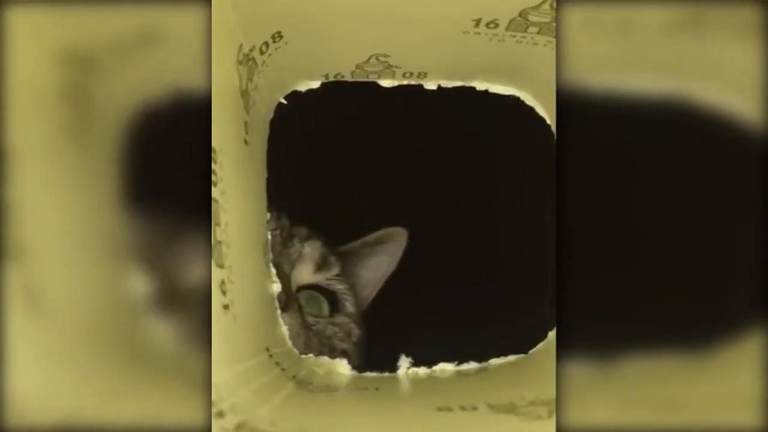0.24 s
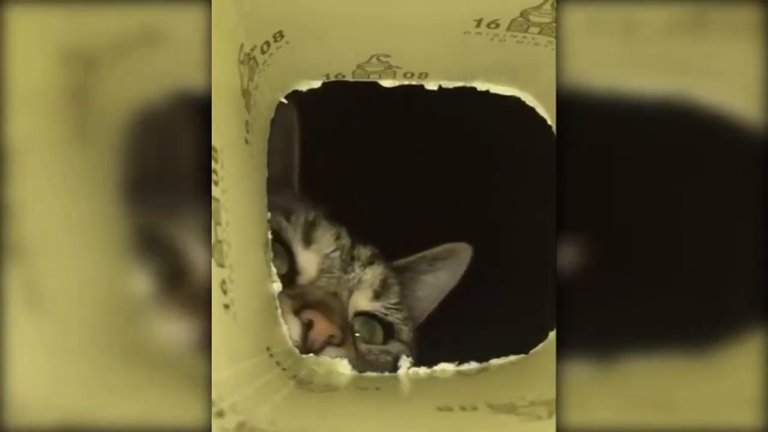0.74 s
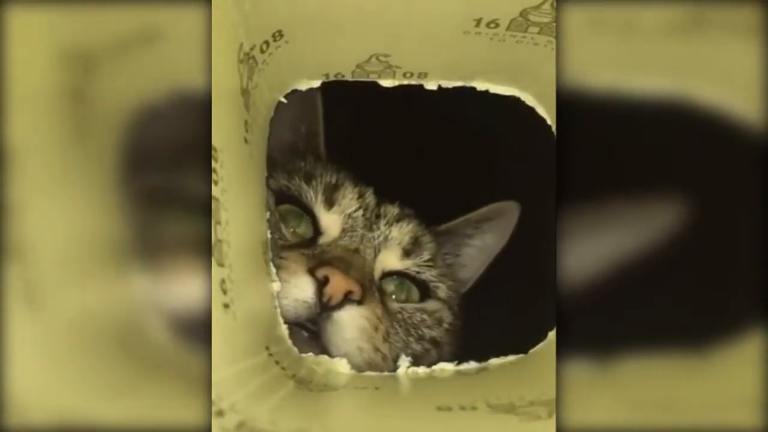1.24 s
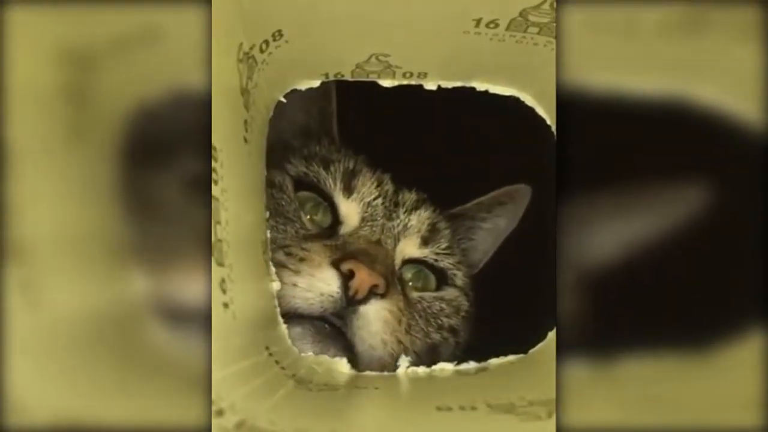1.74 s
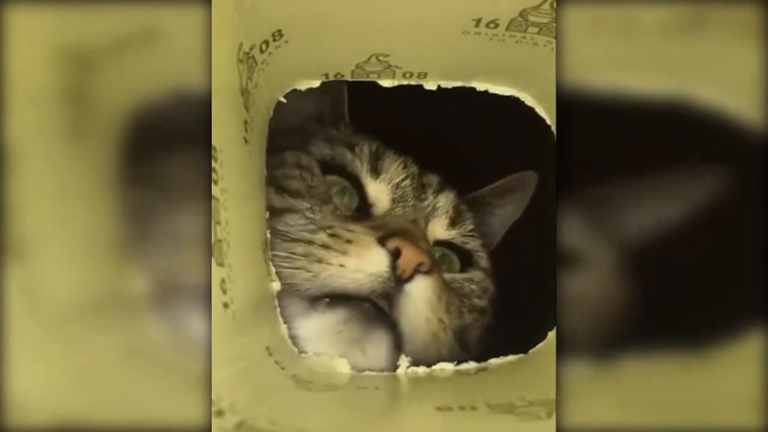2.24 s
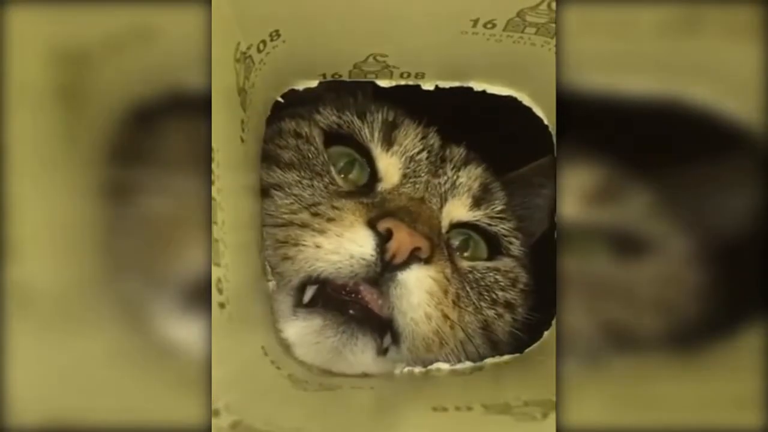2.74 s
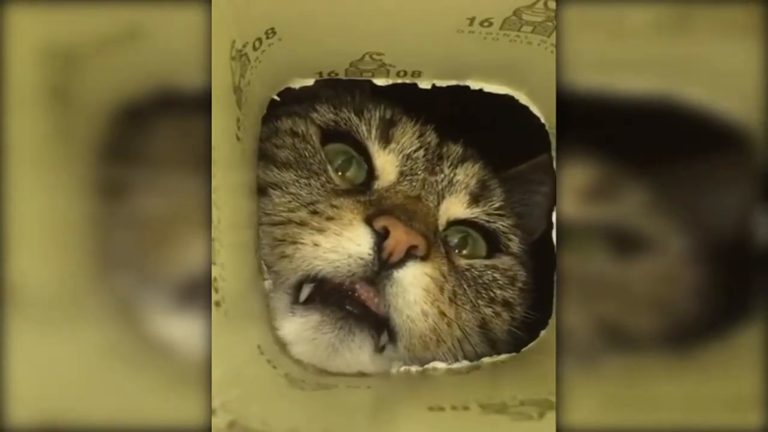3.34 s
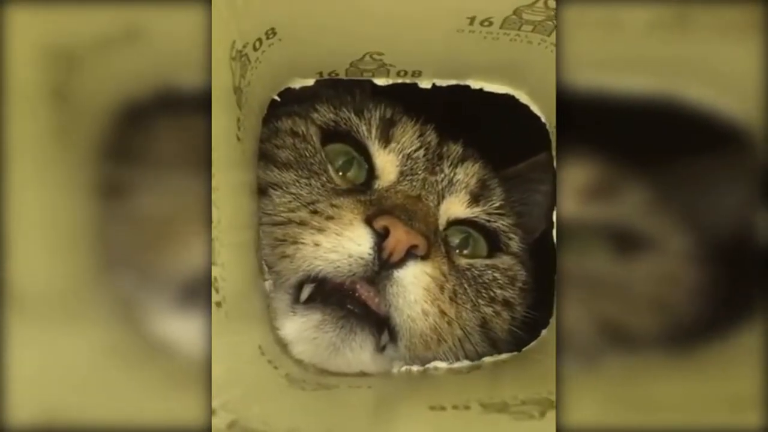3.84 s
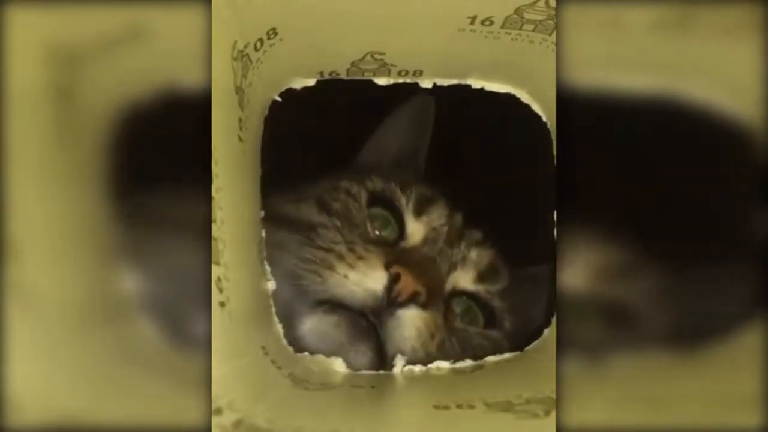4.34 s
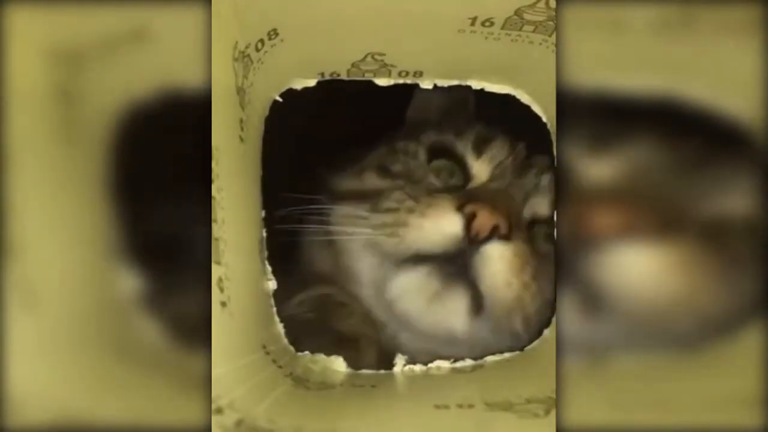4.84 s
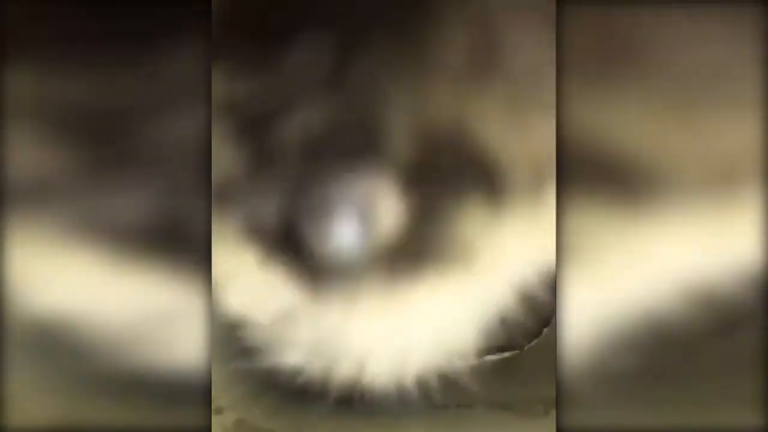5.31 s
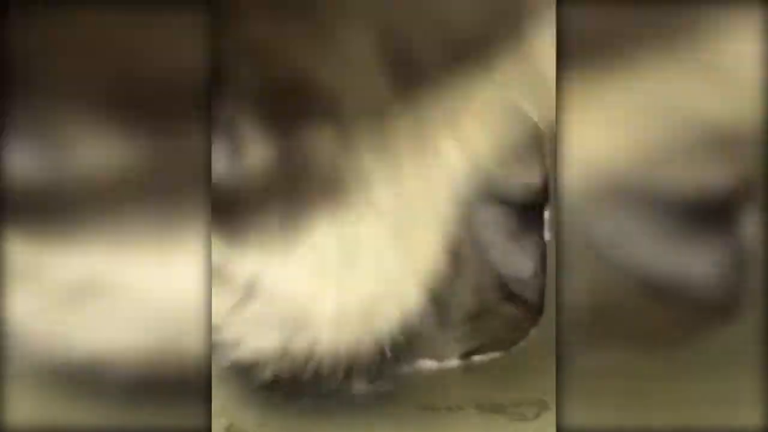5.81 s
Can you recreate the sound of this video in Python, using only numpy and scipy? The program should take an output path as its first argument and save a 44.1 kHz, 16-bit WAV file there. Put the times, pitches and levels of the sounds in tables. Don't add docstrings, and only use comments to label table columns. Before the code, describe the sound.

Two cats scuffle at a cardboard box. It opens with a dull hollow knock and a buzzing cardboard groan, then mostly quiet brushing, faint squeaks and occasional low thumps from inside. A tight group of strong thuds comes midway, then softer bumps. Near the end the sound turns close and bright: sharp claw ticks, rough scraping, fur hiss and crowded heavy knocks, very near the microphone, over low room hum.

```python
import sys
import numpy as np
from scipy import signal
from scipy.fft import rfft, irfft, next_fast_len
from scipy.io import wavfile
from scipy.ndimage import uniform_filter1d, map_coordinates

SR = 44100
rng = np.random.default_rng(int(sys.argv[2]) if len(sys.argv) > 2 else 0)


def persist_wave(psi):
    counts = np.round(np.clip(psi, -1, 1) * 32767).astype(np.int16)
    wavfile.write(sys.argv[1], SR, np.atleast_2d(counts).T)


def gain_from_decibels(decibels):
    exponent = np.asarray(decibels, float) / 20
    return 10 ** exponent


N = 267687

# (time [s], peak [dB], wall pitch [Hz], claw relative to wall [dB])
INNER_PAWS = [(0, -10, 210, -32), (.0065, -6, 150, -18), (.014, -5, 267, -15.5), (.07, -16, 225, -42),
              (0.116, -21.5, 205, -32), (0.129, -28.5, 313, -41.5), (0.247, -38, 300, -12),
              (0.394, -34, 296, -15), (0.619, -37, 236, -13), (1.191, -12.5, 264, -17),
              (2.325, -23, 229, -24.5), (2.347, -3, 217.5, -23.5), (2.363, -28, 195, -13),
              (2.696, 3, 290, -12), (2.765, 1, 286, -14.5), (2.801, -7, 280, -14), (3.424, -22.5, 275, -23),
              (3.462, -24.5, 248, -22), (3.86, -36.5, 207, -16.5), (3.925, -29, 132.6, -31),
              (3.945, -22, 154, -38), (3.951, -19, 200, -18), (3.993, -18.5, 173, -21),
              (4.001, -14.5, 204, -30), (4.034, -16.5, 170, -47), (4.07, -29, 176, -20),
              (4.388, -22.5, 151, -28), (4.748, -37, 171, -17)]
# (time [s], peak [dB], wall pitch [Hz], claw relative to wall [dB])
OUTER_PAWS = [(5.244, -39.5, 199, 12.5), (5.31, -22, 445, -20), (5.3993, -1.5, 282, -42),
              (5.402, -10, 513, -34), (5.405, -6, 115, 3), (5.407, 3.5, 269, -29.5),
              (5.4085, -20, 735, -27), (5.415, -17, 202, -29), (5.427, -19, 139, -29),
              (5.451, -26.5, 650, 6), (5.463, -25, 640, 7), (5.607, -4.5, 352, -9.5),
              (5.618, -16.5, 650, 1.5), (5.626, -5.5, 250, -34), (5.613, -17, 420, -25),
              (5.622, -21.5, 550, -24), (5.635, -18, 400, -22), (5.646, -27, 210, -15),
              (5.683, -28.5, 250, -19.5), (5.78, -25, 210, -20), (5.667, -21.5, 580, -35),
              (5.711, -9.5, 164, -15.5), (5.7401, -6, 273, -34), (5.746, -3.5, 197, -10.5),
              (5.7493, -6, 430, -24), (5.7514, -1, 280, -21), (5.7573, -14, 232, -40),
              (5.786, -11, 263, -13.5), (5.842, -24, 125, -23), (6.013, -27.5, 315, -14)]
# (time [s], peak [dB])
TICKS = [(.115, -43), (.957, -51), (1.076, -52), (1.3783, -34.5), (3.945, -27.5), (3.996, -35),
         (4.029, -37.5), (4.8665, -49), (5.2457, -4.5), (5.283, -31), (5.103, -28), (5.114, -26),
         (5.126, -22.5), (5.469, -26), (5.564, -27), (5.621, -30), (5.915, -31), (5.312, -13.5),
         (5.365, -35.5), (5.4049, -13.5), (5.451, -33), (5.6081, -7), (5.669, -34), (5.7112, -31),
         (5.7455, -17.5), (5.753, -25), (5.767, -16), (5.7868, -5.5),
         (0.7262, -62), (0.7601, -56), (0.798, -55), (0.8165, -43), (0.9985, -54), (1.0255, -56),
           (1.0549, -52), (1.0749, -48), (1.1931, -43), (1.1944, -30.5), (1.343, -46), (1.3779, -40),
           (1.5246, -45), (1.6937, -44), (1.813, -55), (1.994, -51), (2.0045, -50), (2.0325, -42),
           (2.0838, -41), (2.1228, -37), (2.247, -45), (2.2819, -43), (2.2999, -33)]
# (centre [Hz], width [Hz], level [dB])
CLAW_MODES = [(670, 140, -11), (1300, 180, 2), (2310, 142, 3), (2640, 110, -5), (3160, 400, -13),
              (4020, 290, -16), (5180, 60, -20.5)]
# (time [s], slip rate [Hz], level [dB], overtones [dB])
JUDDER = [
    (0, 430.5, -11.5, -20.5),
    (.011, 397, -16.5, -4),
    (.019, 415, -13.5, -17),
    (.045, 418.5, -14.5, -13),
    (.072, 419, -14, -16.5),
    (.09, 418, -31, -16),
]
# (peak [s], rise [s], fall [s], wall rumble [dB], panel drone [dB])
LEANS = [(.04, 0.042, 0.13, -27, -40.5), (.125, 0.049, 0.28, -45.5, -56.5), (.93, 0.091, 0.09, -40.5, -46),
         (1.22, 0.092, 0.17, -47, -54.5), (1.4, 0.18, 0.21, -54, -61.5), (1.64, 0.11, 0.18, -49, -57),
         (2.08, 0.063, 0.38, -51.5, -60), (2.35, 0.11, 0.083, -34.5, -43), (2.44, 0.13, 0.31, -45, -53),
         (2.74, 0.072, 0.042, -39, -52), (2.82, 0.071, 0.095, -38, -52), (3.09, 0.049, 0.027, -50, -58.5),
         (3.25, 0.076, 0.12, -44.5, -70), (3.46, 0.044, 0.35, -47, -64.5), (3.73, 0.12, 0.14, -43, -80),
         (3.96, 0.071, 0.049, -31, -51), (4.03, 0.079, 0.21, -37.5, -54.5),
         (4.388, 0.015, 0.13, -41, -50), (4.6, 0.11, 0.024, -39.5, -49), (4.75, 0.14, 0.19, -50, -58.5),
          (4.918, 0.1, 0.067, -49.5, -46), (5.13, 0.12, 0.15, -36, -37.5),
          (5.231, 0.094, 0.062, -33.5, -39.5), (5.312, 0.027, 0.12, -37, -42.5),
          (5.404, 0.021, 0.16, -30, -39), (5.53, 0.16, 0.13, -57, -44.5), (5.65, 0.12, 0.13, -34.5, -44),
          (5.752, 0.019, 0.019, -15.5, -16), (5.79, .05, 0.037, -24.5, -43.5),
          (5.88, 0.25, 0.5, -44.5, -43), (6.034, 0.066, 0.04, -26, -42.5)]
# (peak [s], rise [s], fall [s], pad scrape [dB], fur hiss [dB])
STROKES = [(.58, 0.048, .05, -68, -82), (1.08, 0.065, .12, -66, -70), (0, .01, 0.14, -47, -52),
           (.128, 0.017, 0.029, -53.5, -55), (.85, 0.12, 0.11, -55.5, -55.5), (.93, 0.16, 0.073, -55, -79),
           (1.07, 0.1, 0.25, -75, -57), (1.21, 0.075, 0.048, -51.5, -59.5), (1.36, 0.076, 0.18, -54, -57),
           (1.57, 0.46, 0.066, -52.5, -59), (1.76, 0.19, 0.54, -65, -69.5), (2.06, 0.061, 0.48, -53, -55.5),
           (2.16, 0.2, 0.069, -44, -57.5), (2.35, 0.11, 0.12, -44.5, -43), (2.4, 0.037, 0.23, -45, -49.5),
           (2.7, 0.015, 0.0071, -78, -47.5), (2.81, 0.46, 0.17, -61.5, -66.5),
           (3.25, 0.091, 0.054, -66.5, -73), (3.43, 0.0073, 0.033, -59, -60.5),
           (3.73, 0.088, 0.073, -68.5, -76.5), (3.914, 0.0037, 0.021, -48, -61),
           (3.95, 0.021, 0.11, -52.5, -49.5), (4.08, 0.15, 0.11, -59, -50), (4.19, 0.31, 0.094, -50, -58),
           (4.29, .08, .05, -71, -63), (4.35, .02, .02, -76, -68), (4.72, .016, 0.036, -65, -56),
          (4.805, 0.066, 0.017, -59.5, -55.5), (5.1, .007, .04, -46, -43.5), (5.232, .03, .015, -43, -45),
          (4.395, 0.005, 0.019, -52, -66), (4.56, 0.099, .05, -55.5, -45),
          (4.586, 0.026, 0.031, -51.5, -37.5), (4.68, 0.04, 0.011, -71.5, -66),
          (4.741, 0.037, 0.086, -50.5, -51), (4.92, 0.042, 0.035, -50, -58),
          (5.031, 0.082, 0.24, -52.5, -47.5), (5.121, 0.037, 0.061, -29.5, -35),
          (5.17, 0.079, 0.11, -34, -37.5), (5.299, 0.016, 0.073, -41, -45), (5.4, 0.037, 0.13, -43.5, -42),
          (5.472, .014, 0.018, -37.5, -50), (5.52, 0.18, 0.089, -44, -52.5),
          (5.611, 0.076, 0.033, -37, -32.5), (5.668, 0.028, 0.063, -47.5, -47.5),
          (5.76, 0.02, .05, -58, -55), (5.803, 0.078, 0.1, -39, -36.5), (5.925, 0.055, 0.063, -58, -36.5),
          (5.99, 0.15, 0.032, -58, -33), (6.019, 0.089, 0.06, -42, -50)]
# rumble [dB], drone [dB], scrape [dB], hiss [dB]
REST_DB = [-59, -67.5, -76.5, -78.5]
# (frequency [Hz], density [dB per Hz])
RUMBLE = [(18, -51.5), (42, -1.5), (113, -8.5), (151, -3.5), (199, -5), (230, -4.5), (278, -1), (430, -12),
          (560, -20), (950, -120)]
# (centre [Hz], width [Hz], level [dB])
PANEL_MODES = [(541, 28, -9.5), (656.6, 45.6, 1.5), (783, 144, -7.5), (895, 226, -10)]
# (centre [Hz], width [Hz], level [dB])
BOX_MODES = [(1300, 125, 1.5), (1308, 147, 7.5), (2230, 110, -6), (2372, 43, 2), (2631, 51, 1),
             (3140, 145, -7), (3570, 100, -9.5), (3780, 117, -9), (5200, 23, -14)]
# (frequency [Hz], density [dB per Hz])
BARE = [(530, -15), (900, 0.5), (1410, 3.5), (1660, -1.5), (2240, -0.5), (2940, -8), (5000, -19),
        (6500, -61), (11000, -120)]
# (frequency [Hz], density [dB per Hz])
HISS = [(2290, -2), (3900, -2), (4110, -3), (4460, -5.5), (5340, -11.5), (6710, -2), (7440, -2.5),
        (8040, -7), (9050, -3), (10200, -9.5), (11100, -6.5), (12600, -8.5), (13400, -14.5)]
# (time [s], centre [Hz])
CAVITY = [(.8, 3000), (1.6, 3160), (2.1, 1486), (2.4, 3000), (4.58, 2760), (5.1, 3200), (5.2, 3000),
          (5.26, 3000), (5.295, 4360), (5.32, 3770), (5.45, 3000), (5.55, 3200), (5.75, 1770), (5.8, 4320),
          (5.98, 4670), (6.03, 4000)]
# (frequency [Hz], density [dB per Hz])
ROOM = [(15, -58), (25, 4), (82, 7.5), (142, -34.5), (288, -24.5), (463, -55), (635, -14), (804, -27),
        (1290, -10.5), (1680, -24.5), (2360, -50), (4930, -52), (6590, -39.5), (11700, -40), (13400, -27.5)]
# centre [Hz], width [Hz], level [dB]
HUM = (88.8, 11.4, -54)
# (centre time [s], half length [s], centre [Hz], width [Hz], level [dB])
SINGS = [(.132, 0.0053, 3300, 400, -54.5), (0.258, 0.064, 2380, 121, -69.5), (0.839, 0.046, 3630, 602, -56),
         (0.864, .06, 2580, 159.6, -55), (.86, 0.041, 5100, 203, -71), (0.94, 0.029, 652, 69.3, -44),
         (1.118, 0.082, 3430, 900, -67), (1.103, 0.088, 5160, 199, -75), (1.497, .1, 5080, 201, -72),
         (1.552, 0.028, 2580, 198, -55), (4.395, .005, 3520, 497, -57), (5.747, 0.0026, 1450, 299.4, -23.5),
         (5.788, .003, 1620, 303, -36), (0.62, 0.0071, 600, 251.7, -51), (3.469, 0.0044, 697, 298, -46.5),
         (1.194, 0.0032, 680, 201.2, -34.5), (0.909, .05, 1151, 600, -53), (1.26, .06, 900, 700, -56),
         (4.447, 0.004, 2300, 250, -57), (4.477, 0.0094, 6700, 202, -69), (4.584, 0.0063, 3270, 301, -42),
         (4.593, .01, 2460, 298, -43), (4.76, 0.023, 2485, 198, -55.5), (4.778, 0.031, 5120, 300, -63),
         (5.132, 0.022, 1205, 301.7, -33), (5.15, 0.038, 3380, 903, -38.5), (5.16, 0.065, 2310, 400, -40.5),
         (5.297, 0.009, 3290, 1002, -38), (5.299, 0.0079, 4250, 1106, -37),
         (5.312, 0.0046, 4480, 1100, -37), (5.292, 0.009, 4910, 1090, -48), (5.17, .05, 1696, 1100, -43),
         (5.409, .004, 744, 303, -17), (5.428, 0.0042, 2240, 250, -38), (5.464, 0.03, 3130, 300, -51),
         (5.511, 0.031, 3400, 302, -47), (5.548, 0.035, 4350, 399, -52.5), (5.568, 0.021, 3180, 304, -43),
         (5.586, 0.033, 2000, 499, -40), (5.811, 0.039, 3350, 349.4, -42), (5.837, .02, 1390, 152, -45),
         (5.956, 0.092, 2880, 299.6, -45), (5.97, 0.031, 4470, 401, -51), (6.018, 0.0018, 1200, 299, -27)]
# (centre time [s], half length [s], pitch [Hz], slide [1/s], level [dB])
PINGS = [
    (.39, .075, 608, 0, -57),
    (1.9, .045, 396, -1.2, -51),
    (4.398, .009, 2380, 0, -51),
]
# (time [s], peak [dB], pitch [Hz], t60 [ms])
THUMPS = [(1.193, -24, 130, 48), (2.349, -24.5, 117, 58), (2.698, -19.5, 60.5, 34), (2.699, -18.5, 149, 21),
          (2.768, -21, 150, 29), (2.804, -31, 150, 24), (3.426, -26, 144, 42), (3.95, -19, 111, 38),
          (4.004, -21, 112, 46), (4.074, -30, 79.4, 73), (4.389, -24.5, 116, 40), (4.75, -33.5, 56.5, 63),
          (5.245, -35, 111, 96), (5.299, -36, 63.6, 190), (5.63, -14, 97, 33), (6.029, -17, 81.4, 34)]
# time [s], peak [dB], pitch [Hz], t60 [ms]
JOLT = (5.7612, 2.1, 99, 27)

OUTSIDE_S = 5.05
RING_MS, RING_MS_PER_DB = 31.9, 1.19
HELD_MS = 18.5
SAG, DEEP_SAG, SAG_S = 0.15, 0.93, 0.0034
ANSWER_S, ANSWER_DB, ANSWER_T60_S, SWELL_S = 0.01278, -14.5, 0.029, 0.011
TOP_DB = -25
EDGE_DB, LEAN_POWER, STROKE_POWER = 22.5, 1.53, 1.67
LIFT_DB, FLAT_HZ, OUTER_DB = 5.5, 1950, 4
ROOM_DB = -63
BOW = 13
LOW_HZ, TOP_HZ, FULL = 40, 13250, .98
WIDE_HZ = 4300


def unit(x):
    return x / np.sqrt(np.mean(x ** 2) + 1e-20)


def colour(points):
    f, v = np.transpose(points)
    return lambda hz: gain_from_decibels(np.interp(np.log(hz + 1), np.log(f + 1), v))


def resonant(peaks):
    def response(f):
        total = 0
        for k, (centre, width, db) in enumerate(peaks):
            damping = 1j * f * width
            total = total + (-1) ** k * gain_from_decibels(db) * damping / (centre * centre - f * f + damping + 1e-9)
        return total
    return response


def curves(rows):
    s, *cols = np.transpose(rows)
    return [np.interp(np.arange(N) / SR, s, c) for c in cols]


def wobble(rate):
    return map_coordinates(rng.standard_normal(int(N * rate / SR) + 4), [np.arange(N) * rate / SR])


def filtered(x, response):
    m = next_fast_len(N + SR // 2)
    return irfft(rfft(x, m) * response(np.fft.rfftfreq(m, 1 / SR)), m)[..., :N]


def wall_ring(t, hz, db, outside):
    if outside:
        fall_db = -60000 * t / max((RING_MS - RING_MS_PER_DB * db) * 0.68, 8)
        sag, rest, gain_db, onset_s = SAG, .947, 3.0, .0014
    else:
        fall_db = -60 * (1000 * t / (HELD_MS - .12 * db)) ** 1.77
        sag, rest, gain_db, onset_s = DEEP_SAG, .77, -.8, .0019
    bent = t + sag * SAG_S * (1 - np.exp(-t / SAG_S))
    ring = -np.sin(2 * np.pi * rest * hz * bent)
    ring += 0.13 * np.sin(2 * np.pi * 1.42 * hz * t)
    ring += .5 * gain_from_decibels(1.27 * fall_db) * np.sin(2 * np.pi * 1.64 * hz * t)
    ring += 0.064 * np.sin(2 * np.pi * 620 * t)
    return gain_from_decibels(db + gain_db + fall_db) * (1 - np.exp(-(t / onset_s) ** 2)) * ring


def air_answer(t, hz, db):
    late = t - ANSWER_S
    envelope = gain_from_decibels(db + ANSWER_DB - 60 * late / ANSWER_T60_S) * (1 - np.exp(-(t / SWELL_S) ** 6))
    return envelope * np.cos(2 * np.pi * 1.09 * hz * late)


def claw_contact(t, grit, outside):
    if outside:
        return 0.96 * t / 0.0017 * np.exp(-t / 0.0016) * grit
    point = 0.67 * np.exp(-((t - .0004) / .00005) ** 2)
    pad = 0.088 * np.exp(-((t - .002) / 0.00028) ** 2)
    return point + pad + 0.17 * gain_from_decibels(-60 * t / 0.017) * grit


def knocks():
    wall, claw, pad, bare, top = np.zeros((5, N + SR))
    t = np.arange(SR // 10) / SR
    lag = round(.001 * SR)
    paws = INNER_PAWS + OUTER_PAWS
    for (s, db, hz, claw_db), grit in zip(paws, rng.standard_normal((len(paws), 2, len(t)))):
        at = round((s + 0.00091) * SR)
        outside = s > OUTSIDE_S
        wall[at + lag:][:len(t)] += wall_ring(t, hz, db, outside)
        if not outside:
            wall[at + lag:][:len(t)] += air_answer(t, hz, db)
        struck = pad if outside else claw
        struck[at:][:len(t)] += gain_from_decibels(db + claw_db + 18.5) * claw_contact(t, grit[0], outside)
        top[at:][:len(t)] += gain_from_decibels(db + claw_db + TOP_DB - 60 * t / 0.036) * grit[1]
    catches = TICKS
    for (s, db), grit in zip(catches, rng.standard_normal((len(catches), len(t)))):
        bare[round(s * SR):][:len(t)] += gain_from_decibels(db + 14.5 - 60 * t / 0.0093) * (0.73 * grit + 5.7 * (t == 0))
    face = resonant([(660, 240, -5.5), (1456, 260, 4.0), (3000, 1150, -1.0)])
    padded = resonant([(600, 250, 3), (1400, 600, 0)])
    snap = gain_from_decibels(-11.5) * filtered(bare[:N], lambda f: face(f) / (1 + 1j * f / 4440.0) ** 2)
    snap += gain_from_decibels(-6.5) * filtered(pad[:N], lambda f: padded(f) / (1 + 1j * f / 2800.0) ** 2)
    return wall[:N] + filtered(claw[:N], resonant(CLAW_MODES)) + snap + filtered(top[:N], colour(HISS))


def judder():
    hz, db, over_db = curves(JUDDER)
    t = np.arange(N) / SR
    jitter = .04 * np.exp(-t / .008) * wobble(300) + .007 * wobble(300)
    turn = 2 * np.pi * np.cumsum(hz * (1 + jitter)) / SR
    over = np.sin(2 * turn + 1) + 0.5 * np.sin(3 * turn + 2)
    for harmonic, gain in enumerate([0.21, 0.18, 0.22, 0.048, 0.07, 0.034], start=4):
        over += gain * np.sin(harmonic * turn)
    over += 0.23 * gain_from_decibels(3 * wobble(60)) * sum(np.sin(odd * turn / 2) * 3 / odd for odd in range(3, 15, 2))
    body_modes = resonant([(126, 57, -4.5), (253, 57, 5.5), (576, 175, -4.5)])
    body = gain_from_decibels(-19.5 - 160 * t) * unit(filtered(rng.standard_normal(N), body_modes))
    modes = resonant(PANEL_MODES + BOX_MODES)
    slips = rng.standard_normal(N) * (1 + np.cos(turn))
    buzz = filtered(slips, lambda f: modes(f) / (1 + 1j * f / 2800) ** 2)
    rattle = gain_from_decibels(-26.5 - 170 * t) * unit(buzz)
    groan = gain_from_decibels(db + 1.5) * (np.sin(turn) + gain_from_decibels(over_db) * over)
    return (groan + rattle) * np.clip((.089 - t) / 0.034, 0, 1) + body * np.clip((.115 - t) / 0.032, 0, 1)


def contacts(rows, top):
    s, rise, fall, *db = np.array(rows).T[..., None]
    t = np.arange(0, N + 64, 64) / SR
    reach = np.where(t < s, (s - t) / np.maximum(rise, .003), (t - s) / np.maximum(fall, .003))
    powers = [np.sum(gain_from_decibels(d - EDGE_DB * reach ** top) ** 2, axis=0) for d in db]
    return [np.interp(np.arange(N) / SR, t, power) for power in powers]


def fibres(spread_db, clump_db):
    return rng.standard_normal(N) * gain_from_decibels(spread_db * rng.standard_normal(N) + clump_db * wobble(120))


def patchy(x, patchy_db, share):
    hz, t, z = signal.stft(x, SR, nperseg=512)
    field = uniform_filter1d(uniform_filter1d(rng.standard_normal(z.shape), 5, 0), 10, 1)
    centre_hz = np.interp(t, *np.transpose(CAVITY))
    bump = np.exp(-(np.log((hz[:, None] + 1) / centre_hz) / .13) ** 2)
    lift_db = LIFT_DB * np.log2(centre_hz / FLAT_HZ) + OUTER_DB * (t > OUTSIDE_S)
    gain = gain_from_decibels(patchy_db * unit(field) + share * lift_db * bump)
    return signal.istft(z * gain, SR, nperseg=512)[1][:N]


def rubbing():
    leaning = contacts(LEANS, LEAN_POWER)
    stroking = contacts(STROKES, STROKE_POWER)
    gains = np.sqrt(leaning + stroking + gain_from_decibels(REST_DB)[:, None] ** 2)
    catch = wobble(25)
    push = filtered(rng.standard_normal(N), colour(RUMBLE))
    rumble = unit(gain_from_decibels(2.6 * wobble(40) + 1.3 * catch) * push)
    panels = filtered(rng.standard_normal(N), resonant(PANEL_MODES))
    drone = unit(gain_from_decibels(1.5 * catch + 3 * wobble(50)) * panels)
    grain = fibres(spread_db=2.5, clump_db=2.5)
    modes = resonant(BOX_MODES)
    inner = unit(filtered(grain, lambda f: modes(f) * f ** 4 / (f ** 4 + 310.0 ** 4)))
    outer = unit(filtered(grain, colour(BARE)))
    board = np.where(np.arange(N) < OUTSIDE_S * SR, inner, outer)
    scrape = unit(gain_from_decibels(.5 * catch) * patchy(board, 1.0, share=0.65))
    fur = filtered(fibres(spread_db=4, clump_db=2.0), colour(HISS))
    hiss = unit(gain_from_decibels(0.21 * catch) * patchy(fur, 3.8, share=0.76))
    return np.sum(gains * [rumble, drone, scrape, hiss], axis=0)


def room():
    hz, width_hz, db = HUM
    air = gain_from_decibels(ROOM_DB + 0.72 * wobble(1.8)) * unit(filtered(rng.standard_normal(N), colour(ROOM)))
    hum = gain_from_decibels(db) * unit(filtered(rng.standard_normal(N), resonant([(hz, width_hz, 0)])))
    return air + hum


def sings():
    half_span = SR // 5
    out = np.zeros(N + SR)
    t = np.arange(-half_span, half_span) / SR
    for (s, half, hz, width_hz, db), knots in zip(SINGS, rng.standard_normal((len(SINGS), 2, 500))):
        a, b = (map_coordinates(k, [(t - t[0]) * min(width_hz, 1200)]) for k in knots)
        swell = np.exp(-(t / half) ** 2)
        band = swell * (a * np.sin(2 * np.pi * hz * t) + b * np.cos(2 * np.pi * hz * t))
        level = gain_from_decibels(db) * np.linalg.norm(swell) / np.linalg.norm(band)
        out[round(s * SR) + half_span:][:len(t)] += level * band
    return out[2 * half_span:][:N]


def pings():
    out = np.zeros(N)
    for s, half, hz, slide, db in PINGS:
        t = np.arange(N) / SR - s
        swell = gain_from_decibels(db + wobble(55)) * np.exp(-(t / half) ** 4)
        arch = t * (1 + slide * t / 2 - BOW * t ** 2 / 3)
        out += swell * np.sin(2 * np.pi * hz * arch + 0.42 * wobble(22.4))
    return out


def thumps():
    out, t = np.zeros(N + SR), np.arange(SR // 5) / SR
    for s, db, hz, t60_ms in [*THUMPS, JOLT]:
        envelope = gain_from_decibels(db + 7.5 - 60000 * t / max(t60_ms, 15)) * (1 - np.exp(-(t / 0.0015) ** 2))
        out[round(s * SR):][:len(t)] += envelope * np.sin(2 * np.pi * hz * t)
    return out[:N]


def scene():
    mono = knocks() + judder() + rubbing() + room() + sings() + pings() + thumps()
    return np.tile(mono, (2, 1))


def top_cut(x):
    return signal.sosfilt(signal.butter(12, 14250, fs=SR, output="sos"), x)


def record(dry):
    high = filtered(dry[0], lambda hz: hz > WIDE_HZ)
    hz, t, z = signal.stft(high, SR, nperseg=256)
    stray = signal.istft(z * np.exp(2j * np.pi * rng.random(z.shape)), SR, nperseg=256)[1][:N]
    side = gain_from_decibels(-2.5) * filtered(stray, lambda hz: hz > WIDE_HZ)
    wide = filtered(dry + side * [[1], [-1]], lambda hz: (hz / (hz - 1j * LOW_HZ)) ** 3)
    clipped = wide / (1 + np.abs(wide / FULL) ** 8) ** (1 / 8)
    mix = filtered(clipped, lambda hz: hz < TOP_HZ)
    return top_cut(mix)


dry = scene()
out = record(dry)
persist_wave(out)
```